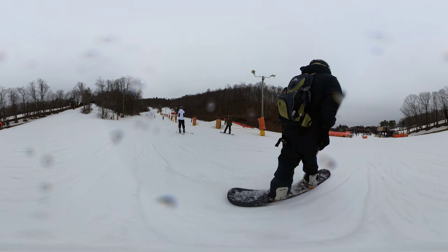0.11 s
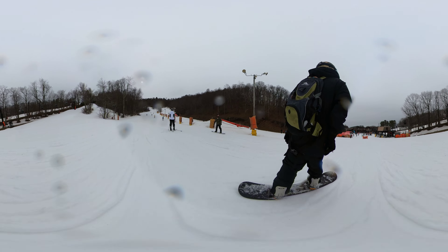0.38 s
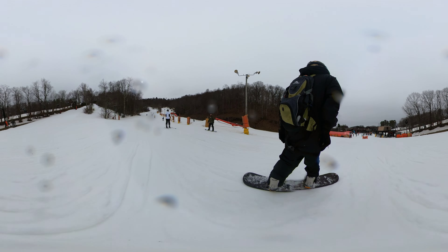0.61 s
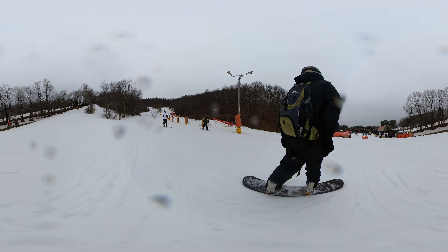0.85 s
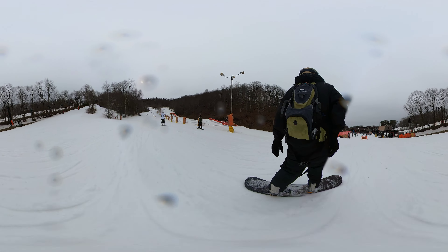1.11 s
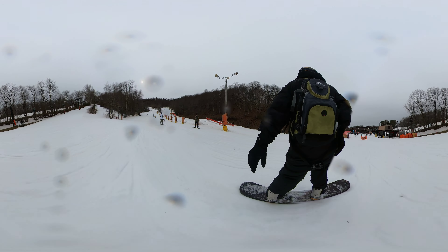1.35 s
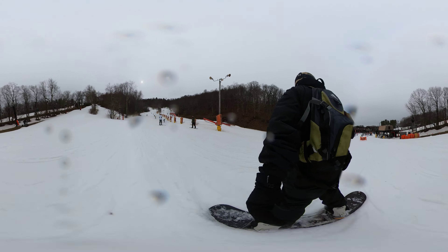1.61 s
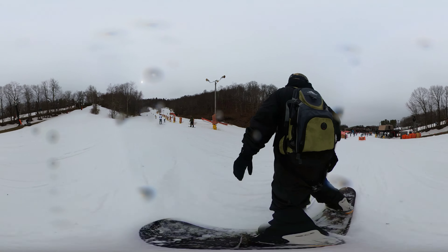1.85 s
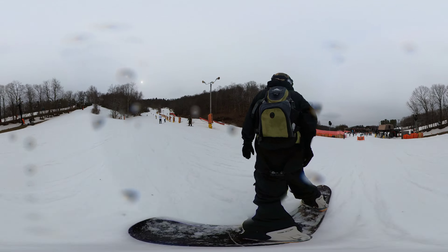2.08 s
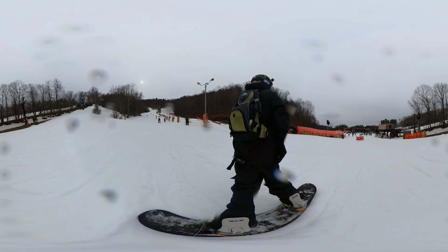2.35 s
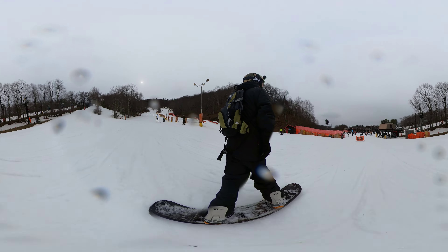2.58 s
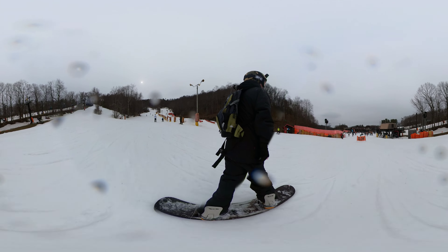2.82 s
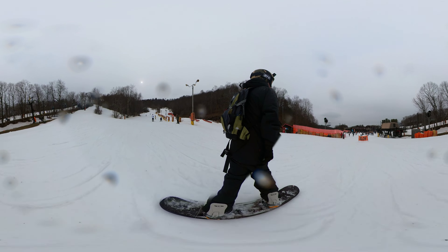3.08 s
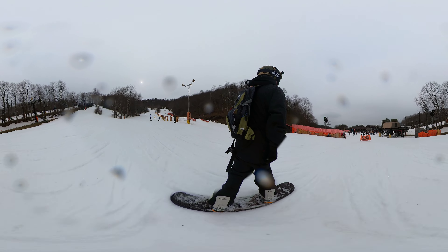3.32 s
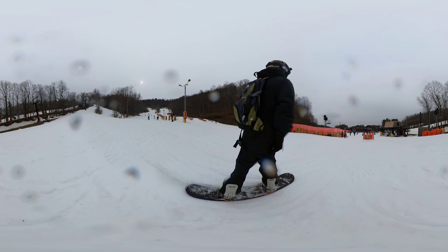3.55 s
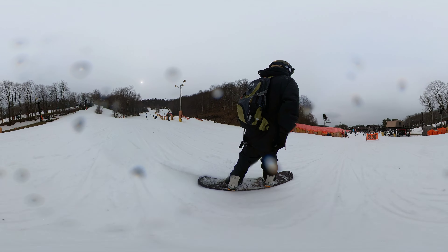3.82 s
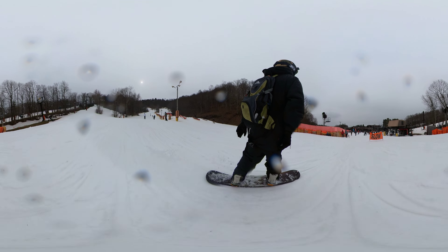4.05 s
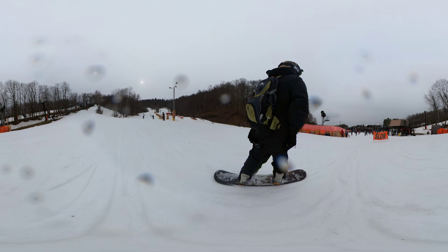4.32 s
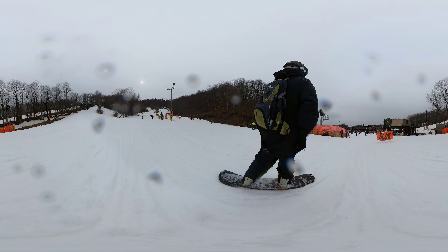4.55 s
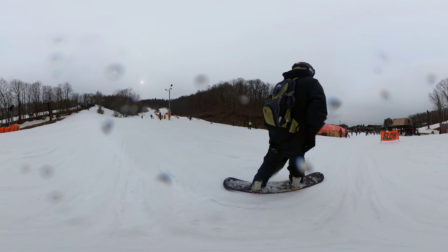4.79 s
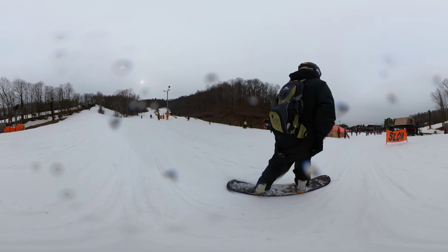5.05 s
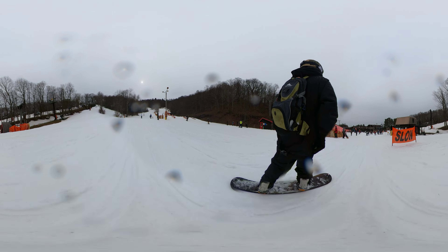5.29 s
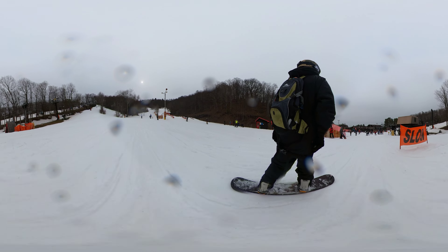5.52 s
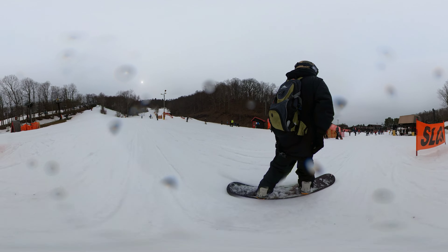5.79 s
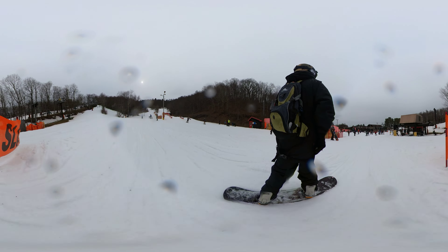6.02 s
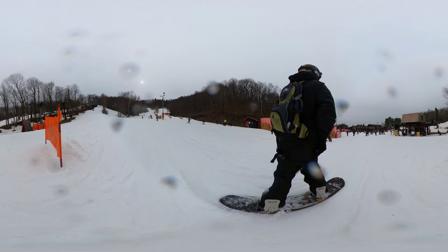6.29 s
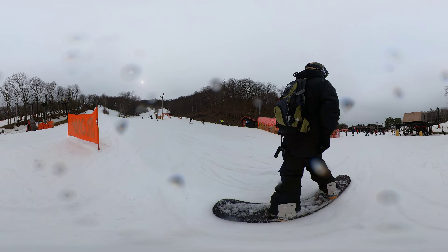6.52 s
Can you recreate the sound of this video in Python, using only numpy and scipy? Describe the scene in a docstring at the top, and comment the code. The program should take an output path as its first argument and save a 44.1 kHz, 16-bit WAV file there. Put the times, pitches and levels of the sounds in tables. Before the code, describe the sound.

A snowboard hisses and scrapes over packed snow, with low wind buffeting and hard hollow knocks shaking the microphone pole, loudest before two seconds.

```python
"""Snowboard on packed snow

A snowboard glides with a camera pole fixed above it. Spray hisses and the base scrapes: shaped random spectra.
Wind and bumps shake the pole, hard knocks ring it: lumpy noise and decaying modes that thud, ring and crack.
A faint tone, noise in a narrow resonance, comes and goes near the end.
A limiter ducks everything after the hardest knocks."""
import sys
import numpy as np
from scipy import signal
from scipy.fft import rfft, irfft
from scipy.io import wavfile
from scipy.ndimage import uniform_filter1d

SR = 44100
rng = np.random.default_rng(int(sys.argv[2]) if len(sys.argv) > 2 else 0)


def dump_mix(stems):
    """Bounce the given channels to the path in sys.argv[1] as a 16-bit WAV at rate SR."""
    frames = np.atleast_2d(stems).T  # one column per channel
    limited = np.clip(frames, -1, 1)  # hard clip at full scale
    pcm = np.round(limited * 32767).astype(np.int16)
    wavfile.write(sys.argv[1], SR, pcm)


def to_linear_factor(level_db):
    """Convert decibel levels (scalar or array-like) to linear amplitude factors."""
    exponent = np.asarray(level_db, float) / 20
    return 10 ** exponent


N = 292824

# Glide over the snow. Each row: time in seconds, spray level in dB, scrape level in dB.
GLIDE_LEVELS = [(0.0, -41, -50.5), (0.24, -49, -54), (0.33, -42, -51), (0.5, -41.5, -46),
                (0.95, -40.5, -50), (1.26, -41.5, -46.5), (1.6, -43.5, -53.5), (1.845, -46, -55.5),
                (1.865, -37, -48), (2.0, -41, -48), (2.45, -38.5, -42.5), (2.56, -41.5, -47),
                (2.75, -43, -48), (2.85, -48, -52.5), (3.05, -44.5, -51.5), (3.2, -49, -53),
                (3.4, -46.5, -55), (3.55, -43.5, -49), (3.9, -43.5, -53.5), (4.8, -45, -54.5),
                (5.03, -39.5, -51.5), (5.4, -40, -50), (5.88, -38.5, -50), (5.99, -44.5, -54),
                (6.22, -38.5, -50), (6.64, -44, -52.5)]
# Stance of the board, held until the next row. Each row: start in seconds, edge spray over flat spray in dB.
EDGE_STANCES = [(0.0, 8.5), (0.26, 0.5), (0.5, 1.5), (1.5, -1.5), (2.555, 10), (5.01, -1.5)]
# Spectrum of the high spray of the edge. Each row: frequency in Hz, relative density in dB per Hz.
EDGE_SPRAY_COLOUR = [(1500, -71), (3400, -16), (5400, -9.5), (7900, -8), (10400, -5), (12200, 5),
                     (12900, 5.5), (14100, 4.5), (15700, 2)]
# Spectrum of the low spray. Each row: frequency in Hz, relative density in dB per Hz.
FLAT_SPRAY_COLOUR = [(3000, -36.5), (4500, -22.5), (6000, -15), (7900, -12.5), (9400, -6), (11000, -1.5),
                     (12000, -4), (14000, -26)]
# Spectrum of the scraping base. Each row: frequency in Hz, relative density in dB per Hz.
SCRAPE_COLOUR = [(300, -3.5), (700, 0), (1100, 1), (1600, -1), (2900, 0.5), (3500, 0), (4300, -6),
                 (7000, -15)]
# Stereo width of the glide, before the artificial switching is added. Each row: frequency in Hz, side against mid in dB.
GLIDE_WIDTH = [(1800, -38.5), (2600, -48), (3300, 0), (5000, 0), (8000, 1.5), (11000, -1), (16000, -9)]
# Slow level of the pole. Each row: time in seconds, shaking in dB, rattle of the upper modes in dB.
POLE_LEVELS = [(0.0, -40, -62), (0.2, -40, -57), (0.29, -54, -56.5), (0.45, -41.5, -55.5), (0.6, -32, -44),
               (0.93, -47.5, -56.5), (1.3, -37.5, -47.5), (1.6, -48, -53), (1.82, -54, -59),
               (1.91, -41.5, -50), (2.1, -52, -53.5), (2.34, -40, -49), (2.66, -59.5, -62),
               (2.95, -47, -55.5), (3.4, -55, -62.5), (3.6, -43.5, -56), (4.45, -44.5, -54),
               (4.9, -39, -53.5), (5.04, -45, -60), (5.3, -45, -53), (6.0, -42.5, -55),
               (6.64, -42.5, -62.5)]
# Rough patches that jolt the pole. Each row: centre in seconds, shaking in dB, rattle in dB.
ROUGH_PATCHES = [(.345, -36.5, -59), (.59, -34, -50), (.98, -34.5, -60), (1.11, -38.5, -63),
                 (1.3, -39.5, -51), (1.439, -51, -43), (1.535, -35.5, -61), (2.589, -42, -55),
                 (2.92, -43, -63), (3.22, -46, -67), (3.29, -43, -59), (3.53, -46, -44), (3.93, -41, -52.5),
                 (4.0, -38, -60), (4.249, -36.5, -44), (4.8, -48, -63), (4.89, -37, -52),
                 (4.965, -27.5, -34.5), (4.999, -32, -44.5), (5.155, -32, -46.5), (5.345, -35.5, -63),
                 (5.66, -46, -62), (5.75, -38, -64), (6.57, -42, -53)]
# Spectrum of the wind buffeting. Each row: frequency in Hz, relative density in dB per Hz.
BUFFET_COLOUR = [(20, -42), (40, -22), (60, -3), (100, 7.5), (150, -1.5), (200, -3), (300, -55)]
# Spectrum of the rattle. Each row: frequency in Hz, relative density in dB per Hz.
RATTLE_COLOUR = [(150, -36), (250, 4.5), (400, -1.5), (600, -9.5), (900, -17), (1200, -21), (1600, -62)]
# Upper modes of the pole. Each row: frequency in Hz, relative level in dB, T60 in seconds after a hard blow.
UPPER_MODES = [(366, 1, 0.043), (463, -1.5, 0.03), (561, -11, 0.054), (680, -2.5, 0.046),
               (753, -10.5, 0.062)]
# Small hard parts that crack. Each row: frequency in Hz, relative level in dB, T60 in seconds.
CRACK_MODES = [(1500, -9, 0.04), (1870, -0.5, 0.0051), (2420, -5.5, 0.0089), (2860, -8, 0.029)]
# Hard blows. Each row: time in seconds, level of the lowest mode in dB, its frequency in Hz,
# hardness as dB of the modes above 600 Hz, crack in dB against the lowest mode.
HARD_BLOWS = [(.1435, -20.5, 155, 3, -5), (.156, -34.5, 148, 9, -30), (.6055, -23, 99, -19, -36),
              (1.6495, -20.5, 152, -15, -25), (1.7232, -33, 187, 5, -23), (1.7308, -9, 127, -1.5, -24.5),
              (2.838, -34.5, 160, -15, -12), (2.919, -38, 103, -9, -41), (3.28, -44, 154, -2, -32),
              (3.429, -51, 104, 12.5, -30), (4.239, -32.5, 111, -15, -30), (5.504, -27, 175, -20, -27.5),
              (5.56, -27.5, 147, -13, -32), (6.068, -43.5, 92, 8, -30), (6.152, -30, 151, -7, -33)]
# Faint tone. Each row: time in seconds, level in dB.
WHINE_LEVELS = [(5.2, -90), (5.3, -63), (5.5, -65), (5.9, -70), (6.35, -77), (6.45, -58.5), (6.64, -61)]

FFT_SIZE, HOP = 512, 128  # samples
TIP_S, JOLT_HALF_WIDTH_S = 0.015, 0.02
SOFT_T60_S, KNOCK_T60_S = 0.035, 0.094  # lowest mode
UPPER_DB, UPPER_DB_PER_HARD_DB = -4.5, 0.38  # upper modes against the lowest, growth with hardness
WHINE_HZ = 1039


def evened(x):
    """Scales to unit RMS."""
    return x / np.sqrt(np.mean(x ** 2) + 1e-20)


def read(points, hz):
    """Interpolates a spectrum over log frequency."""
    f, value = np.transpose(points)
    return np.interp(np.log(hz + 1), np.log(f + 1), value)


def curves(rows, t):
    """Interpolates each level column over time."""
    s, *columns = np.transpose(rows)
    return [np.interp(t, s, c) for c in columns]


def shape(points, hz, lo_hz, hi_hz):
    """Gain over frequency with unit power between lo_hz and hi_hz."""
    gain = to_linear_factor(read(points, hz))
    inside = (hz > lo_hz) & (hz < hi_hz)
    return (gain / np.linalg.norm(gain[inside]))[:, None]


def patches(frames, bins, long, wide):
    """Random field of unit RMS, smoothed twice over `long` frames and `wide` bins."""
    field = rng.standard_normal((frames, bins)).T
    for _ in range(2):
        field = uniform_filter1d(field, wide, axis=0)
        field = uniform_filter1d(field, long, axis=1)
    return evened(field)


def ring(hz, t60_s, t):
    """One mode: a sine that decays 60 dB in t60_s."""
    return to_linear_factor(-60 * t / t60_s) * np.sin(2 * np.pi * hz * t)


def modes(rows, t, t60_scale=1.0):
    """Several modes struck together."""
    return sum(to_linear_factor(db) * ring(hz, t60_scale * t60_s, t) for hz, db, t60_s in rows)


def press(t, rise_s):
    """Onset that rises exponentially towards 1."""
    return 1 - np.exp(-t / rise_s)


def swells(rows, t):
    """Power of short bell-shaped swells, one curve for each level column."""
    s, *columns = np.transpose(rows)
    coarse_t = t[::64, None]
    bells = np.exp(-((coarse_t - s) / JOLT_HALF_WIDTH_S) ** 2)
    return [np.interp(t, coarse_t[:, 0], bells @ to_linear_factor(c) ** 2) for c in columns]


def edge_level(t):
    """Edge spray over flat spray in dB as the board tips from one stance to the next."""
    starts, levels_db = np.transpose(EDGE_STANCES)
    edge_db = np.full(len(t), levels_db[0])
    for s, step_db in zip(starts[1:], np.diff(levels_db)):
        edge_db += step_db * np.clip((t - s) / TIP_S + 0.5, 0, 1)
    return edge_db


def artificial_switching(frames, hz):
    """Side-against-mid change in dB, no motion of the snow: one hears the top treble switch in tiles."""
    tiles = rng.standard_normal((frames // 8, 33)).T  # 23 ms by 700 Hz each
    tiles = evened(uniform_filter1d(tiles, size=3, axis=1))
    depth = rng.exponential(1, (frames // 8, 33)).T
    switch = np.where(tiles > 0.45, 14 * depth, -70)  # towards the sides, or to the middle
    switch = np.kron(switch, np.ones((8, 8)))[:len(hz)]
    treble = np.clip((hz[:, None] - 8000) / 300, 0, 1)
    return (switch + 0.5) * (treble + 0.13)  # weaker below 8 kHz


def glide():
    """Spray and scrape as random short-time spectra; returns mid and side."""
    frames, hz = 8 * (N // 1024 + 2), np.fft.rfftfreq(FFT_SIZE, 1 / SR)
    bins = len(hz)
    t = np.arange(frames) * HOP / SR
    spray_db, scrape_db = curves(GLIDE_LEVELS, t)
    power = (shape(EDGE_SPRAY_COLOUR, hz, 11800, 15500) * to_linear_factor(spray_db + edge_level(t))) ** 2
    power += (shape(FLAT_SPRAY_COLOUR, hz, 8500, 11300) * to_linear_factor(spray_db)) ** 2
    power += (shape(SCRAPE_COLOUR, hz, 900, 3600) * to_linear_factor(scrape_db)) ** 2
    chatter = patches(frames, bins, 5, 90)  # the board skips: wide bands flicker together
    grain = patches(frames, bins, 8, 8)
    size = np.sqrt(power) * to_linear_factor(1.0 * chatter + 0.94 * grain)
    width_db = read(GLIDE_WIDTH, hz)[:, None]
    lean = np.arctan(to_linear_factor(width_db + artificial_switching(frames, hz)))  # mid-to-side angle
    a, b, c, d = rng.standard_normal((frames, bins, 4)).T
    mid_noise, side_noise = a + 1j * b, c + 1j * d
    spectra = np.array([np.cos(lean) * mid_noise, np.sin(lean) * side_noise]) * size
    overlap = FFT_SIZE - HOP
    flat = signal.istft(mid_noise / np.sqrt(bins), nperseg=FFT_SIZE, noverlap=overlap)[1]
    unit = np.sqrt(np.mean(flat ** 2))  # RMS of a spectrum of unit power
    sound = signal.istft(spectra, nperseg=FFT_SIZE, noverlap=overlap)[1][:, :N]
    return sound / unit * to_linear_factor(0.06)


def shaking():
    """Wind lumps as coloured noise under random soft bumps that ring the pole."""
    t, hz = np.arange(6000) / SR, np.fft.rfftfreq(N, 1 / SR)
    clock = np.arange(N) / SR
    slow_shake_db, slow_rattle_db = curves(POLE_LEVELS, clock)
    shake_jolt, rattle_jolt = swells(ROUGH_PATCHES, clock)
    shake_gain = np.sqrt(to_linear_factor(slow_shake_db) ** 2 + shake_jolt)
    rattle_gain = np.sqrt(to_linear_factor(slow_rattle_db) ** 2 + rattle_jolt)

    lumps = to_linear_factor(2.3 * evened(uniform_filter1d(rng.standard_normal(N), 900)))
    gusts = rfft(rng.standard_normal(N) * lumps)
    wind = evened(irfft(gusts * to_linear_factor(read(BUFFET_COLOUR, hz)), N))
    rattle = evened(irfft(gusts * to_linear_factor(read(RATTLE_COLOUR, hz)), N))

    chance, strength = rng.random(N), rng.exponential(1, N)
    sign = rng.choice([-1, 1], N)
    bumps = (chance < 90 / SR) * sign * to_linear_factor(1.9 * np.minimum(strength, 3))  # about 90 a second
    soft = press(t, 0.0041)  # snow lumps press gradually
    low_ring = soft * (ring(141.0, SOFT_T60_S, t) + 0.57 * ring(81, 0.027, t))
    upper_ring = soft * modes(UPPER_MODES, t, t60_scale=0.5)
    low = evened(signal.oaconvolve(bumps, low_ring)[:N])
    upper = evened(signal.oaconvolve(bumps, upper_ring)[:N])
    body = to_linear_factor(-1.0) * wind + to_linear_factor(-1.0) * low
    return shake_gain * body + rattle_gain * (to_linear_factor(0.5) * rattle + to_linear_factor(-6) * upper)


def knocks():
    """Hard blows through the pole: a short crack, upper modes, and the lowest mode swelling just after."""
    length = 8000
    out, t = np.zeros(N + length), np.arange(length) / SR
    dull = modes([row for row in UPPER_MODES if row[0] < 600], t)
    bright = modes([row for row in UPPER_MODES if row[0] > 600], t)
    crack = modes(CRACK_MODES, t)
    for s, db, hz, hard_db, crack_db in HARD_BLOWS:
        low = -ring(hz, KNOCK_T60_S, t) * press(t, 0.0018)
        upper = (dull + to_linear_factor(hard_db) * bright) * press(t, 0.001)  # the blow takes a moment to land
        upper_gain = to_linear_factor(UPPER_DB + UPPER_DB_PER_HARD_DB * hard_db)
        blow = low + upper_gain * upper + to_linear_factor(crack_db) * crack
        out[round(s * SR):][:length] += to_linear_factor(db) * blow
    return out[:N]


def whine():
    """A faint fuzzy tone: noise in a narrow resonance."""
    hz = np.fft.rfftfreq(N, 1 / SR)
    resonance = 1 / (1 + ((hz - WHINE_HZ) / 12) ** 2)
    tone = irfft(rfft(rng.standard_normal(N)) * resonance, N)
    level_db, = curves(WHINE_LEVELS, np.arange(N) / SR)
    return to_linear_factor(level_db) * evened(tone)


def scene():
    """Glide in stereo, with pole and tone in the middle."""
    mid, side = glide()
    mid = mid + shaking() + knocks() + whine()
    return np.array([mid + side, mid - side])


def roll_off(x):
    """The treble ends steeply here."""
    return signal.sosfilt(signal.butter(12, 17050, fs=SR, output="sos"), x)


def record(dry):
    """Microphone band, then a limiter that pulls down after loud peaks and recovers."""
    highpass = signal.butter(3, 52, "high", fs=SR, output="sos")
    lowpass = signal.firwin(511, 15830, window=("kaiser", 9), fs=SR)
    band = signal.sosfilt(highpass, dry)
    band = signal.oaconvolve(band, lowpass[None], "same")
    power = uniform_filter1d((band ** 2).mean(0), 300)
    power_db = 10 * np.log10(abs(power) + 1e-12)
    fall_db = np.arange(N) * 60.0 / SR  # held peak level falls 60 dB a second
    held_db = np.maximum.accumulate(power_db + fall_db) - fall_db
    over_db = np.maximum(held_db + 26.5, 0)  # threshold -26.5 dB
    ducked = band / to_linear_factor(0.53 * uniform_filter1d(over_db, 200))
    return roll_off(ducked)


dry = scene()
out = record(dry)
dump_mix(out)
```